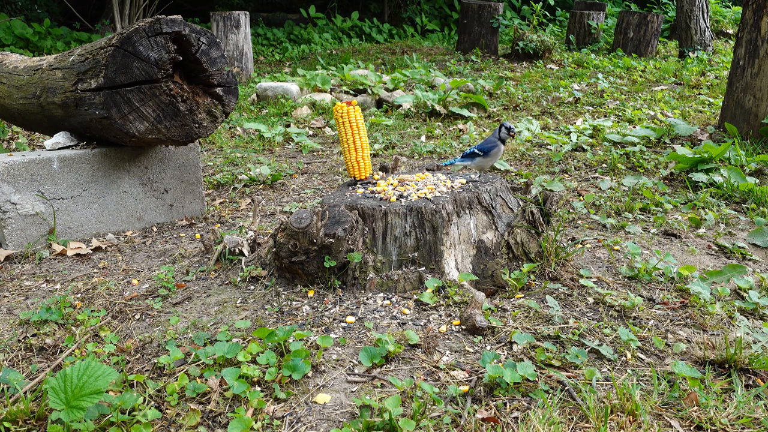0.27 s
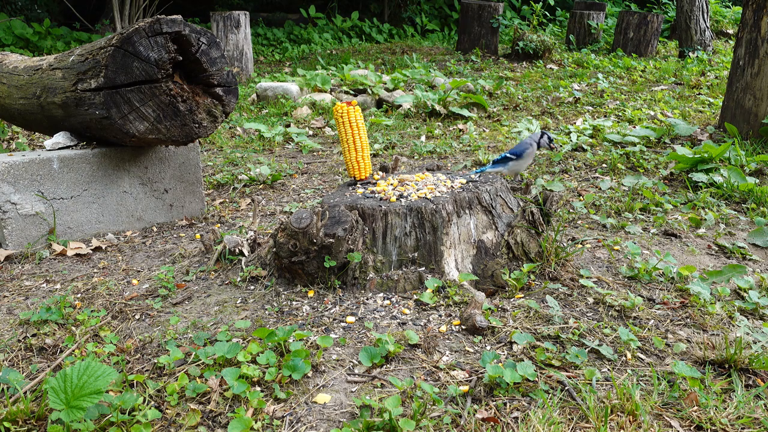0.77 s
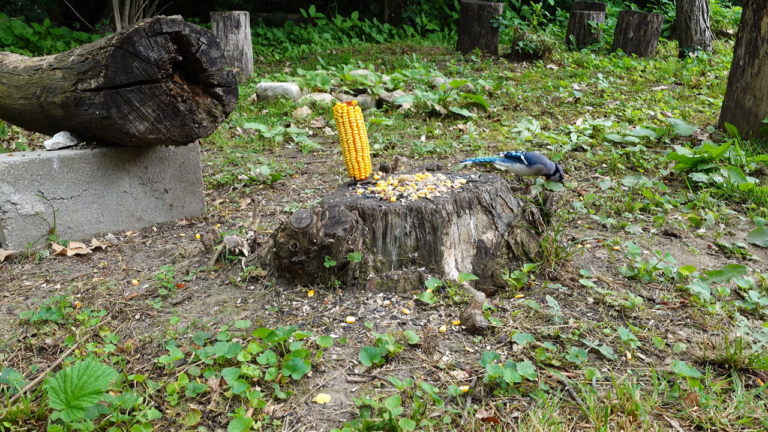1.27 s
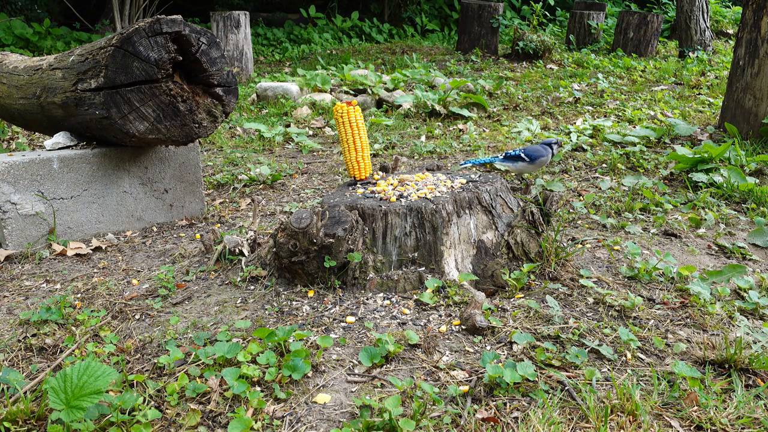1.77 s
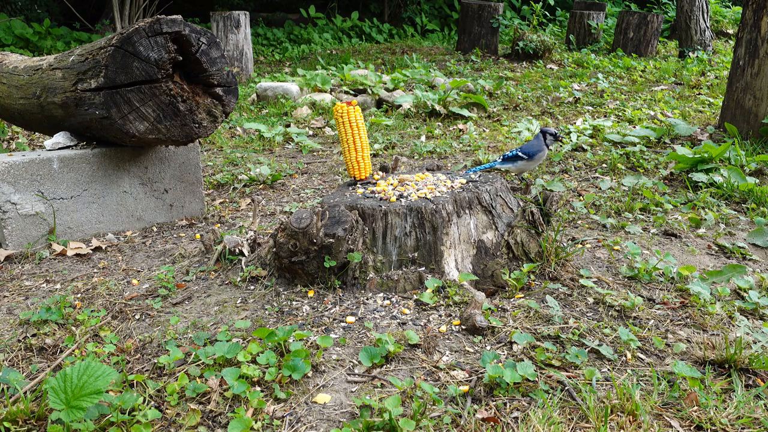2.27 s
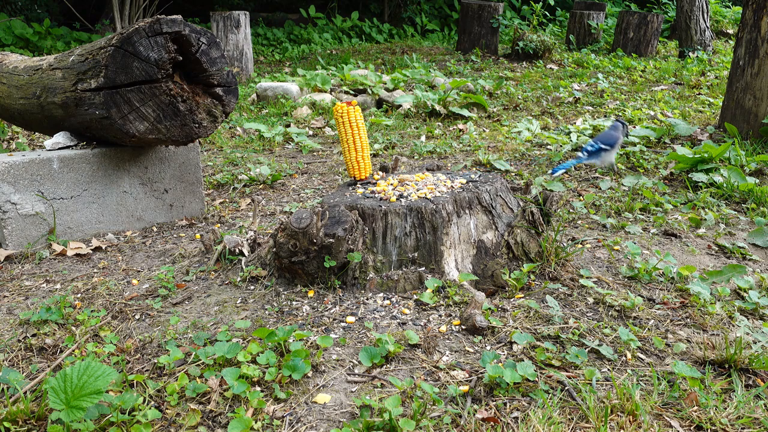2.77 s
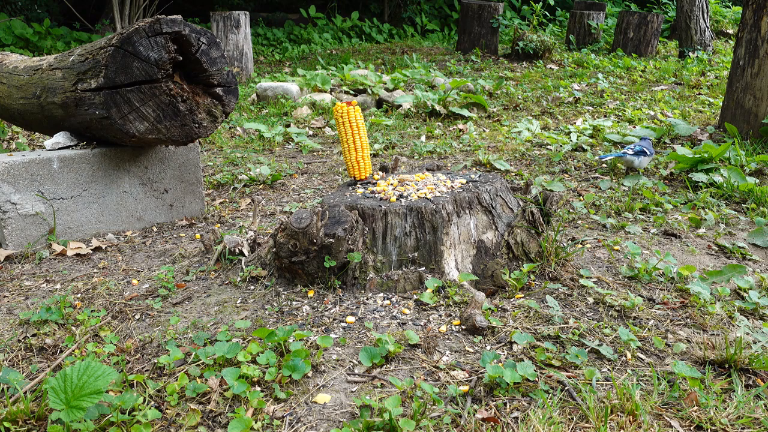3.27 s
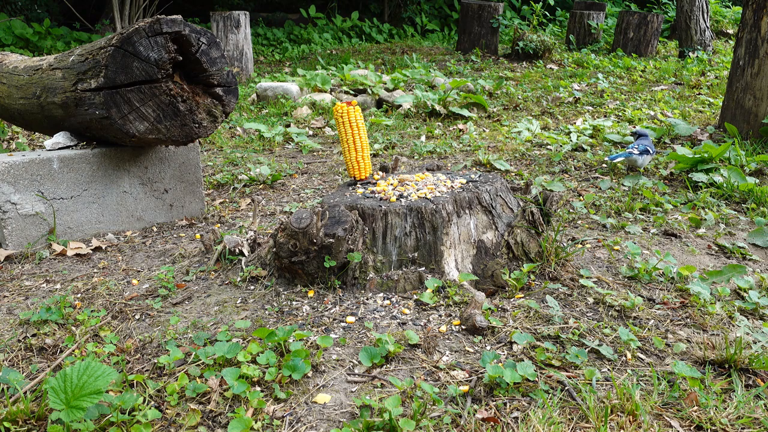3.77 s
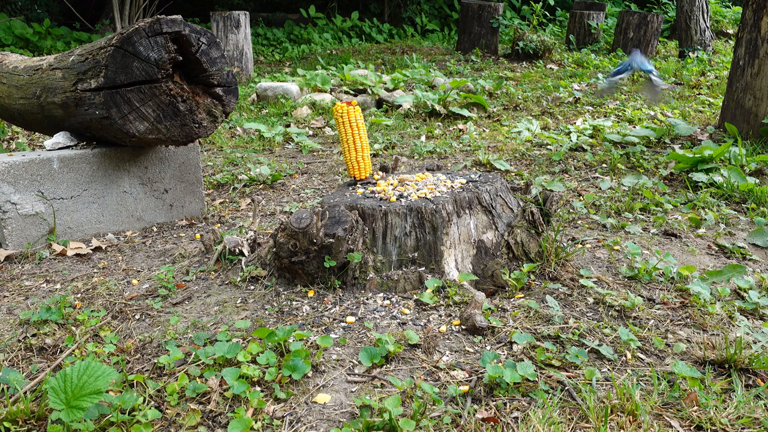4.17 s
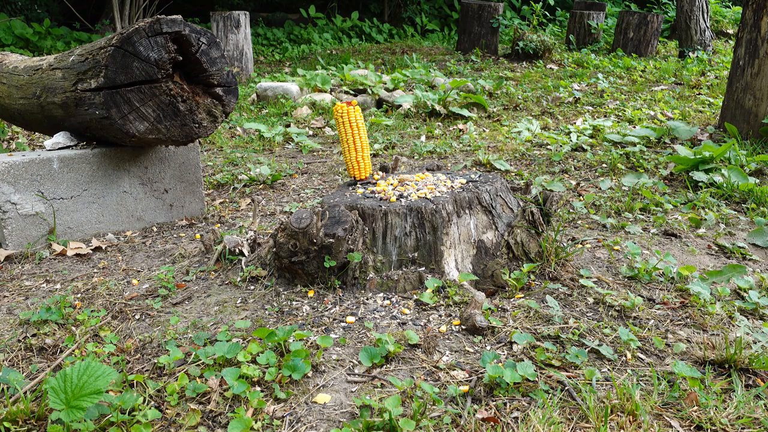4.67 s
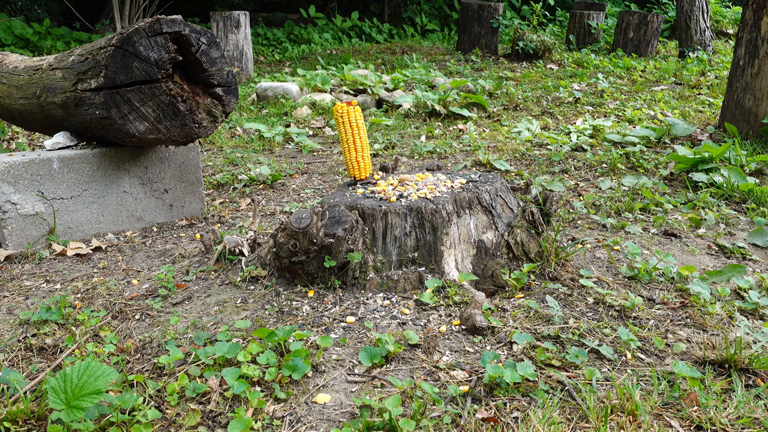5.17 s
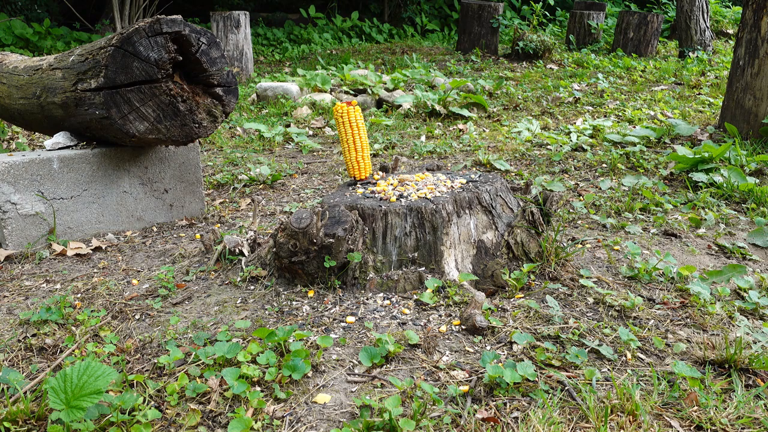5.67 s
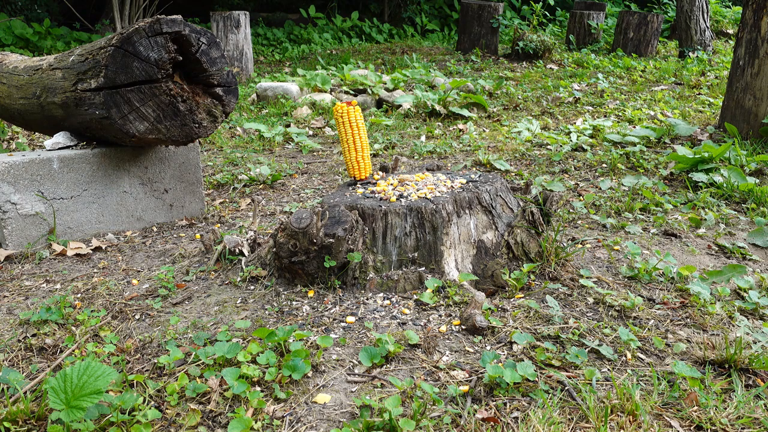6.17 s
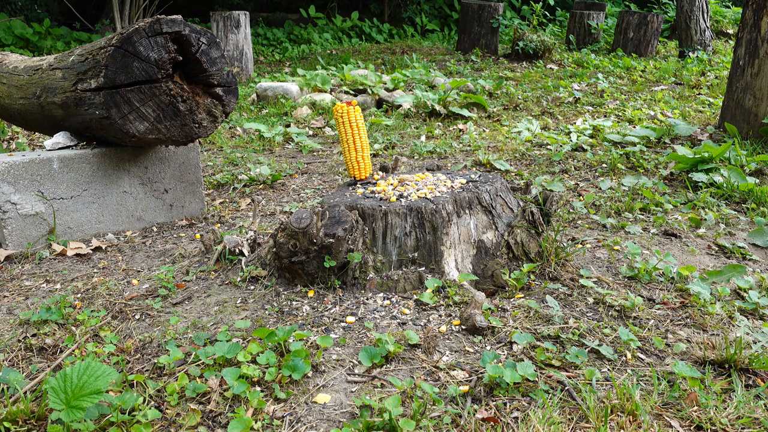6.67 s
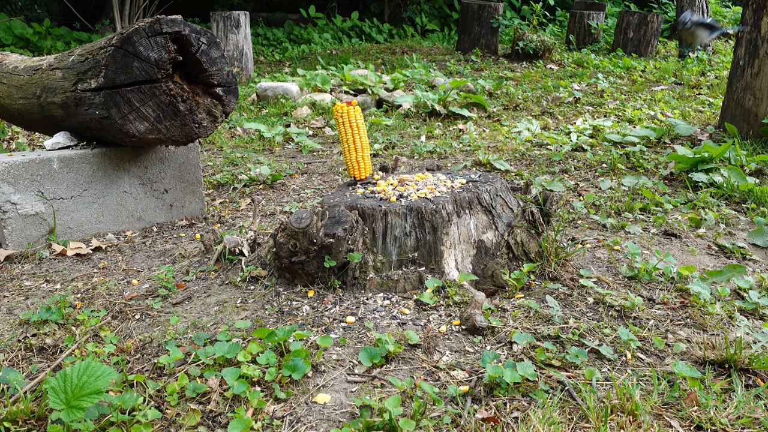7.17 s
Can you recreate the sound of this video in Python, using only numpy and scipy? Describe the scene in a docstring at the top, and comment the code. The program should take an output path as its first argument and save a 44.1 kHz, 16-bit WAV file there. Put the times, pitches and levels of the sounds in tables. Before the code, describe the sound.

A calm wooded backyard, heard by a fixed stereo microphone: a soft wash of far traffic and leaves, a very faint dull machine knocking eight or nine times a second, and a thin insect hiss that comes and goes. Distant small birds sound blurred by tree echo: a hoarse chirp at 0.2 s, quick falling whistles at 1.2, 1.6 and 1.9, a thin high call at 1.7, another chirp at 2.1. At 2.5 a jay a few metres away screams once, harsh, nasal and buzzing, until 2.85, far louder than everything else, with a short woody echo. A fast trill runs from 3.0 to 3.6, then a chirp. From 4.1 to 4.8 soft airy wingbeats with ticks and faint low thumps fade away. A hooked chirrup comes at 5.2, small peeps near 5.7, thin calls and a chirp around 6.3, a slurred whistle at 6.9, and a brief flutter with a bright tick at 7.3.

```python
"""A jay screams once from a stump a few metres away: a partial stack chopped and sawn by a membrane.
It flaps off and another bird lands at the end: coloured noise puffs, bright ticks, low thumps.
Far sparrows, whistlers and a triller are swept sines, mostly heard as noise-tail echo from trees.
Behind them: shaped noise for distant traffic, dull bursts of a far machine, a faint insect hiss."""
import sys
import numpy as np
from scipy import signal
from scipy.fft import rfft, irfft, next_fast_len
from scipy.io import wavfile
from scipy.ndimage import uniform_filter1d

SR = 44100
rng = np.random.default_rng(int(sys.argv[2]) if len(sys.argv) > 2 else 0)


def digitize_waveform(pressure):
    """Quantize a signal to 16-bit integers and store it at the path in sys.argv[1].

    Rows of a 2-D input are taken as channels; values are limited to [-1, 1].
    """
    field = np.atleast_2d(pressure).T
    bounded = np.clip(field, -1, 1)
    quanta = np.round(bounded * 32767).astype(np.int16)
    wavfile.write(sys.argv[1], SR, quanta)


def makeup_ratio(level_db):
    """Linear amplitude ratio for a level in decibels (20 dB per factor of ten)."""
    decades = np.asarray(level_db, float) / 20
    return 10 ** decades


N = 326781
TIME = np.arange(N) / SR

# Scream contour before colour: t/s, pitch f/Hz, level/dB
SCREAM_CONTOUR = [(2.5, 620, -59.5), (2.53, 682, -45), (2.555, 755, -47), (2.59, 778, -38.5),
                  (2.625, 805, -30), (2.65, 807, -26), (2.69, 793, -24), (2.74, 771.6, -24.5),
                  (2.798, 747.7, -25), (2.815, 745, -27.5), (2.834, 732.6, -30), (2.848, 733, -44)]
# Scream partials: multiple of the pitch, relative level/dB
SCREAM_PARTIALS = [(1, -49.5), (2, -20.5), (3, -19.5), (4, 0), (5, -11.5), (6, -9), (7, -17), (8, -17.5),
                   (9, -16), (10, -15.5), (11, -22), (12, -25.5), (13, -24), (14, -35.5), (15, -31.5),
                   (16, -34), (17, -33), (18, -38), (19, -37), (20, -49.5)]
# Open-beak resonances: centre f/Hz, width f/Hz, share of the gape gain (0-1)
BEAK_RESONANCES = [(4200, 830, 0.98), (7900, 300, 0.7)]
# Wing strokes: centre t/s, level/dB, Gaussian width t/s
WING_STROKES = [(4.135, -65, 0.011), (4.176, -62.5, 0.0077), (4.202, -70, 0.022), (4.254, -63.5, 0.018),
                (4.319, -64, .02), (4.379, -68.5, 0.023), (4.445, -69.5, .02), (4.527, -72.5, 0.028),
                (4.625, -65.5, 0.012), (4.684, -71.5, 0.025), (4.734, -73, .015), (4.793, -77, 0.036),
                (7.246, -76, .02), (7.319, -65.5, 0.0076), (7.35, -73, 0.0087), (7.379, -77, .02)]
# Colour of air through feathers: f/Hz, relative density level/dB
FEATHER_COLOUR = [(300, -15), (700, -3), (1500, -5.5), (4000, -2), (9000, -6.5), (15000, -13.5)]
# Claw and feather-tip ticks: t/s, nominal level/dB
TICK_STRENGTHS = [(4.065, -53), (4.173, -53), (4.3648, -52), (4.4802, -59), (4.5025, -53), (6.902, -67),
                  (6.9543, -54), (6.962, -53.5), (7.3233, -35.5)]
# Air thumps of the hard climbing strokes: start t/s, start level/dB
WING_THUMPS = [(4.168, -76), (4.243, -77), (4.302, -72), (4.365, -81), (4.43, -80)]
# Hoarse sparrow chirps, dry: start t/s, first f/Hz, last f/Hz, top level/dB, start shake scale f/Hz
SPARROW_CHIRPS = [(0.221, 5900, 5000, -63, 330), (.275, 4310, 4580, -60, 150),
                  (2.14, 4600, 4800, -59.5, 230), (3.595, 4200, 4985, -56, 151),
                  (4.3, 4310, 4820, -57.5, 150), (6.475, 4540, 4754, -54, 101)]
# Whistles, dry, most of them falling: start t/s, length t/s, first f/Hz, last f/Hz, level/dB
WHISTLE_NOTES = [(1.19, 0.059, 5460, 2980, -60), (1.612, .062, 5400, 3040, -58),
                 (1.892, 0.069, 5700, 3080, -57), (1.56, 0.038, 5800, 6080, -69)]
# Hooked chirrup, dry: t/s, pitch f/Hz, nominal level/dB
HOOKED_CHIRRUP = [(5.2, 4080, -65), (5.215, 4900, -60), (5.23, 3750, -58), (5.255, 3600, -63),
                  (5.272, 4700, -64), (5.31, 3190, -58)]
# Thin high call, each singing: start t/s, reference level/dB
THIN_CALLS = [(1.685, -62), (4.222, -63), (6.246, -60)]
# Its notes: delay t/s, length t/s, first f/Hz, last f/Hz, relative level/dB, fade level/dB
THIN_CALL_NOTES = [(0, .1, 7760, 7800, -1.5, -11), (0, .09, 6917, 6990, 0.5, -7),
                   (.03, .06, 7460, 5990, -8, 4.5), (.06, .1, 7450, 7400, -9, -6),
                   (.09, .09, 6950, 6200, -8.5, 0.5)]
# Trill note: period t/s, length t/s, top f/Hz, bottom f/Hz, dry start level/dB
TRILL_NOTE = (0.046, 0.04, 4400, 2700, -58)
# Nearer slurred whistle, dry: t/s, pitch f/Hz, level/dB
SLURRED_WHISTLE = [(6.885, 2179, -76), (6.901, 2250, -69.5), (6.967, 2755, -65.5), (7.017, 2865, -71),
                   (7.029, 2800, -60), (7.149, 2156, -65.5), (7.199, 2505, -76), (7.22, 2440, -71)]
# Steady peeps, dry: start t/s, length t/s, f/Hz, top level/dB, end level relative to it/dB
STEADY_PEEPS = [(0.116, .07, 4120, -78, -6), (2.268, 0.16, 2900, -72, -7), (5.573, .025, 2690, -76, -6),
                (5.694, .03, 4100, -73, -14), (5.702, 0.06, 2690, -75, -20), (5.838, .03, 2700, -79, -5),
                (5.95, .05, 2680, -77.5, -10), (7.2, 0.078, 2780, -74, 2)]
# Wash colour: f/Hz, relative mid density level/dB
WASH_COLOUR = [(15, -88.5), (25, -62.5), (64, -31.5), (113, -24.5), (140, -24), (583, -15), (850, -4.5),
               (1170, -7.5), (1500, -13.5), (1810, -14.5), (2490, -22), (2700, -21), (3350, -22.5),
               (5450, -24), (15600, -38.5)]
# Wash width: f/Hz, side minus mid level/dB
WASH_WIDTH = [(60, -20), (110, -17.5), (200, -14.5), (380, -6.5), (700, -7.5), (1290, -6.5), (2380, -2.5),
              (4400, -5.5), (8120, -6), (15000, -6.5)]
# Machine pace: t/s, knocks so far
KNOCK_COUNT = [(-.005, 0), (2.438, 21), (3.595, 31), (5.621, 48), (6.438, 55), (7.526, 64)]
# Knock colour: f/Hz, relative density level/dB
KNOCK_COLOUR = [(250, -69.5), (600, -20.5), (950, 5.5), (1200, -4), (1900, -24), (4000, -80)]
# Insect hiss: t/s, mean level/dB
INSECT_LEVEL = [(0, -85), (.8, -81), (1.5, -76.5), (3.3, -80), (4.0, -85), (5.0, -79), (5.6, -93.5),
                (6.2, -81.5), (6.9, -84), (7.41, -89)]


def curve(rows):
    """Columns of a table interpolated along time."""
    t_s, *columns = np.transpose(rows)
    return [np.interp(TIME, t_s, column) for column in columns]


def gate(start_s, end_s, edge_s):
    """One between start and end, with linear edges inside."""
    return np.clip(np.minimum(TIME - start_s, end_s - TIME) / edge_s, 0, 1)


def ramp(start_s, end_s):
    """Zero before start, linear rise, one after end."""
    return np.clip((TIME - start_s) / (end_s - start_s), 0, 1)


def unit(x):
    """Scale to rms one."""
    return x / np.sqrt(np.mean(x ** 2))


def along_hz(points, hz):
    """Read (f/Hz, value) points on a log-frequency axis."""
    f, value = np.transpose(points)
    return np.interp(np.log(hz + 1), np.log(f), value)


def colour(x, points):
    """Zero-phase filter by (f/Hz, gain/dB) points."""
    size = next_fast_len(N)
    gain = makeup_ratio(along_hz(points, np.fft.rfftfreq(size, 1 / SR)))
    return irfft(rfft(x, size) * gain, size)[..., :N]


def walk(rate_hz, length=N):
    """Smoothed noise of rms one, changing about rate_hz times a second."""
    size = max(int(SR / rate_hz), 1)
    noise = rng.standard_normal(length)
    return unit(uniform_filter1d(uniform_filter1d(noise, size), size))


def pan(x, left_minus_right_db):
    """Stereo pair from mono by level difference."""
    return x * makeup_ratio(np.array([[left_minus_right_db / 2], [-left_minus_right_db / 2]]))


def trees(x, rise_s, t60_s, late_db, late_t60_s, alike):
    """Trunks and leaves scatter a dense echo: a near part plus a fainter, longer far part; energy about one."""
    t = TIME[:SR]
    shared, *own = rng.standard_normal((3, SR))
    alike = np.clip(alike, 0, 1)
    decay = makeup_ratio(-60 * t / t60_s) + makeup_ratio(late_db - 60 * t / late_t60_s)
    decay = decay * (1 - np.exp(-t / rise_s))
    noise = np.sqrt(alike) * shared + np.sqrt(1 - alike) * np.array(own)
    echo = noise * decay / np.sqrt(np.sum(decay ** 2))
    return signal.fftconvolve(x[None], echo, axes=1)[:, :N]


def note(rows, shake):
    """Sine along (t/s, f/Hz, level/dB) rows; shake is added in Hz, scaled by a fourth column if present."""
    t_s, *columns = np.transpose(rows)
    on = slice(int(t_s[0] * SR), int(t_s[-1] * SR))
    t, out = TIME[on], np.zeros(N)
    hz, db, *shake_scale = (np.interp(t, t_s, column) for column in columns)
    hz = hz + shake[on] * (shake_scale[0] if shake_scale else 1)
    edge = np.clip(np.minimum(t - t_s[0], t_s[-1] - t) / 0.0034, 0, 1)
    phase = 2 * np.pi * np.cumsum(hz) / SR
    out[on] = np.sqrt(2) * makeup_ratio(db) * edge * np.sin(phase)
    return out


def glide(start_s, length_s, first_hz, last_hz, db, fade_db):
    """Rows of a straight note."""
    return [(start_s, first_hz, db), (start_s + length_s, last_hz, db + fade_db)]


def voicing():
    """A chopped onset settles, odd partials join as the period doubles, the voice tires, cracks, the beak closes."""
    settled, doubled, tired = ramp(2.52, 2.56), ramp(2.57, 2.635), ramp(2.624, 2.797)
    cracked, closed = ramp(2.786, 2.797), ramp(2.82, 2.85)
    onset, pushed = 1 - settled, tired ** 0.65
    odd_db = -7 * onset - 35 * settled * (1 - doubled) + 0.6 * doubled - 8.5 * tired + 7.2 * cracked - 4 * closed
    strain_db = -1.5 + 4.5 * onset - 2.47 * doubled + 10.5 * pushed - 1.5 * cracked - 4 * closed  # per octave
    low_db = 11 + 7 * onset - 8 * doubled - 6.5 * pushed + 12 * cracked - 6 * closed
    gape_db = 2.5 + 2.5 * onset - 3 * doubled - 6 * tired + 19 * cracked - 9.5 * closed
    depth = 0.07 + 0.7 * onset - 0.032 * tired + 0.075 * cracked
    swing = 0.019 + 0.04 * onset - 0.014 * doubled + 0.008 * tired + 0.0041 * cracked
    rasp = 0.13 + 0.06 * onset - 0.05 * doubled + 0.6 * doubled * (1 - doubled) + 0.1 * tired + 0.12 * cracked
    flutter_hz = 137.9 + (155.6 - 137.9) * onset
    flutter_hz = flutter_hz * (1 + 0.04 * doubled * walk(81))
    return odd_db, strain_db, low_db, gape_db, depth, swing, np.maximum(rasp, 0), flutter_hz


def jay():
    """A fluttering membrane chops the onset and saws the pitch of a partial stack; rasp scatters each partial."""
    hz, db = curve(SCREAM_CONTOUR)
    odd_db, strain_db, low_db, gape_db, depth, swing, rasp, flutter_hz = voicing()
    start_s, end_s = SCREAM_CONTOUR[0][0], SCREAM_CONTOUR[-1][0]
    on = slice(int(start_s * SR), int(end_s * SR))
    turn = 2 * np.pi * np.cumsum(flutter_hz[on]) / SR
    saw = np.sin(turn) + 0.6 * np.sin(2 * turn) + 0.2 * np.sin(3 * turn)  # pitch drops fast, rises slowly
    jitter = 0.015 * (rasp * walk(360))[on]
    phase = 2 * np.pi * np.cumsum(hz[on] * (1 - swing[on] * saw + jitter)) / SR
    pulse = np.exp(3 * (np.cos(turn) - 1)) - 0.2
    voice, power = 0, 0
    for k, part_db in SCREAM_PARTIALS:
        f = k * hz[on]
        beak = sum(share * np.exp(-((f - centre) / width) ** 2) for centre, width, share in BEAK_RESONANCES)
        gain_db = part_db + (k % 2) * odd_db[on] + strain_db[on] * np.log2(max(k / 4, 1))
        gain = makeup_ratio(gain_db + (k < 3) * low_db[on] + gape_db[on] * beak)
        # the membrane's snap dents partials more, the further they lie from the third
        snap_depth = 0.6 * min(abs(k - 3) / 6, 1) * makeup_ratio(3 * walk(90, len(turn)))
        snap = np.exp(-snap_depth * pulse)
        re, im = (walk(800, len(turn)) for _ in range(2))
        rough = rasp[on] * min((k / 6) ** 1.1, 2.6)  # high partials break up first
        scatter = rough * (re + 1j * im)
        lag = 0.11 * k ** 2  # rad; the windpipe spreads the partials
        voice = voice + gain * snap * np.real((1 + scatter) * np.exp(1j * (k * phase + lag)))
        power = power + gain ** 2 * (1 + 2 * rough ** 2) / 2
    out = np.zeros(N)
    out[on] = voice / np.sqrt(power) * np.exp(1.5 * depth[on] * (np.cos(turn + 0.25) - 0.7))
    out = out * makeup_ratio(db) * gate(start_s, end_s, 0.004)
    out = colour(out, [(500, -49), (1050, 1.5), (15000, -0.5)])
    # the camera body shades the left port, most in the treble
    shaded = colour(out, [(1000, -4.5), (3000, -3.0), (13000, -5.0)])
    to_trees = colour(out, [(1500, -4.0), (4000, 0.5), (8000, 2.5), (15000, -3.5)])
    return makeup_ratio(1.0) * np.array([shaded, out]) + makeup_ratio(-16) * trees(to_trees, 0.017, 0.28, -21.5, 1.1, 0.63)


def wings():
    """Strokes puff air through feathers, hard ones thump with rising pitch; ticks are short bright cracks."""
    puffs = sum(makeup_ratio(db) * np.exp(-0.5 * ((TIME - s) / width_s) ** 2) for s, db, width_s in WING_STROKES)
    air = unit(colour(rng.standard_normal(N), FEATHER_COLOUR)) * makeup_ratio(1.5 * walk(300)) * puffs
    air += sum(note(glide(s, 0.018, 170, 450, db, 0.5), 60 * walk(200)) for s, db in WING_THUMPS)
    t = TIME[:400]
    tick_shape = np.sqrt(t / 0.0016) * np.exp(-t / 0.0021)
    ticks = np.zeros(N)
    for (s, db), crack in zip(TICK_STRENGTHS, rng.standard_normal((len(TICK_STRENGTHS), len(t)))):
        ticks[int(s * SR):][:len(t)] += makeup_ratio(db - 4.5) * crack * tick_shape
    near = air + colour(ticks, [(1500, -23), (3500, -3.5), (7000, 4.5), (15000, -0.5)])
    to_trees = colour(near, [(300, -16), (1500, 1.0)])
    return pan(near, -4.0) + makeup_ratio(-8) * trees(to_trees, 0.0027, 0.24, -28.5, 0.8, 0.3)


def chirp(start_s, first_hz, last_hz, db, shake_hz):
    """Rows of a chirp: swells on a fairly steady pitch, then fades while shaking ever wider."""
    swell_s, length_s = 0.05, 0.165
    return [(start_s, first_hz, db - 9.5, shake_hz),
            (start_s + swell_s, 0.7 * first_hz + 0.3 * last_hz, db, 2.8 * shake_hz),
            (start_s + length_s, last_hz, db - 10, 1400)]


def peep(start_s, length_s, hz, db, fade_db):
    """Rows of a peep: swells on one pitch until 0.4 of its length, then glides to its end level."""
    return [(start_s, hz, db - 6), (start_s + 0.4 * length_s, hz, db), (start_s + length_s, hz, db + fade_db)]


def far_birds():
    """Sine chirps, whistles, calls, peeps and a trill, scattered by trees; some direct sound for most."""
    flutter = 0.5 * np.sin(2 * np.pi * np.cumsum(110 * (1 + 0.25 * walk(80))) / SR)
    burr = flutter + 1.1 * np.tanh(0.8 * walk(640) * makeup_ratio(3 * walk(90)))  # sparrow hoarseness
    chirps = sum(note(chirp(*row), burr) for row in SPARROW_CHIRPS)
    blur = 70 * walk(250)  # Hz; turbulent air on the way blurs the clear notes
    clear = sum(note(glide(*row, 0), blur) for row in WHISTLE_NOTES)
    clear += makeup_ratio(1.0) * note(HOOKED_CHIRRUP, 1.54 * blur)
    for s, db in THIN_CALLS:
        for delay_s, length_s, first_hz, last_hz, rel_db, fade_db in THIN_CALL_NOTES:
            rows = glide(s + delay_s, length_s, first_hz, last_hz, db + rel_db, fade_db)
            clear += note(rows, 0.76 * blur)
    period_s, length_s, top_hz, low_hz, db = TRILL_NOTE
    starts_s = 3.035 + period_s * np.arange(13)
    trill = sum(note(glide(s, length_s, top_hz, low_hz, db, -3.5), 1.8 * blur) for s in starts_s)
    slur = sum(note(rows, 0.15 * blur) for rows in [SLURRED_WHISTLE] + [peep(*row) for row in STEADY_PEEPS])
    return (trees(chirps, 0.0073, 0.44, -10.5, 0.89, 0.31) + makeup_ratio(-3.5) * chirps
            + trees(clear + slur, 0.013, 0.79, -16.5, 1.5, 0.6) + makeup_ratio(-11.5) * clear
            + trees(trill, 0.016, 0.44, -18.5, 1.0, 0.77) + pan(slur, -2.5))


def wash():
    """Far traffic and leaves: noise octaves swell together and flicker alone; bass is nearly alike left and right."""
    size = next_fast_len(N)
    hz = np.fft.rfftfreq(size, 1 / SR)
    mid, side = rfft(rng.standard_normal((2, size)))
    side = makeup_ratio(along_hz(WASH_WIDTH, hz)) * side
    both = makeup_ratio(along_hz(WASH_COLOUR, hz)) * (mid + side * np.array([[1], [-1]]))
    out, swell_db = 0, 0.67 * walk(0.79)
    for octave in range(4, 15):
        share = np.clip(1 - np.abs(np.log2(hz + 1) - octave), 0, 1)
        out = out + irfft(both * share, size)[:, :N] * makeup_ratio(swell_db + 0.8 * walk(6))
    return unit(out) * makeup_ratio(-64)


def knocking():
    """Far machine, some 8.5 knocks a second at drifting pace: dull noise bursts of random strength."""
    count = curve(KNOCK_COUNT)[0] + 0.5
    age_s = (count % 1 - 0.5) / np.gradient(count) / SR
    strength = makeup_ratio(2.6 * rng.standard_normal(int(count[-1]) + 1))[count.astype(int)]
    bursts = strength * np.exp(-0.5 * (age_s / 0.012) ** 2) * rng.standard_normal(N)
    return makeup_ratio(-66.5) * colour(bursts, KNOCK_COLOUR) / np.sqrt(1500 / SR)


def insects():
    """Narrow noise band that comes and goes."""
    centre_hz = 5310
    band = [(0.84 * centre_hz, -40), (0.97 * centre_hz, 0), (1.03 * centre_hz, 0), (1.15 * centre_hz, -40)]
    hiss = unit(colour(rng.standard_normal((2, N)), band))
    return hiss * makeup_ratio(curve(INSECT_LEVEL)[0] + 1.4 * walk(9.4))


def scene():
    """Sum of all sources, stereo."""
    return jay() + wings() + far_birds() + wash() + knocking() + insects()


def low_pass(x):
    """Removes everything above the highest recorded frequency."""
    return signal.sosfilt(signal.butter(12, 15710, fs=SR, output="sos"), x)


def record(dry):
    """Output of the finished mix."""
    return low_pass(dry)


dry = scene()
out = record(dry)
digitize_waveform(out)
```